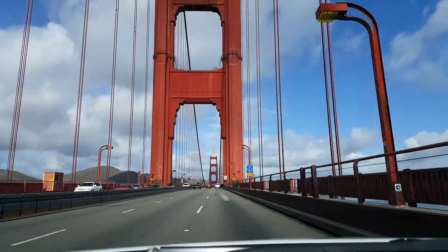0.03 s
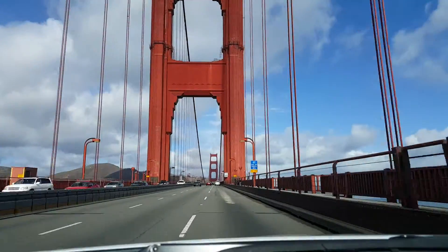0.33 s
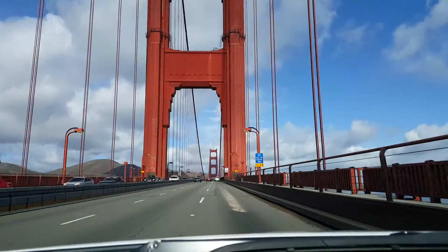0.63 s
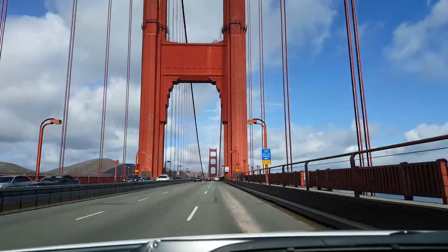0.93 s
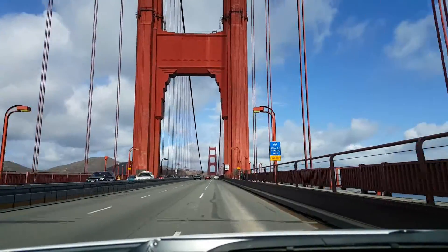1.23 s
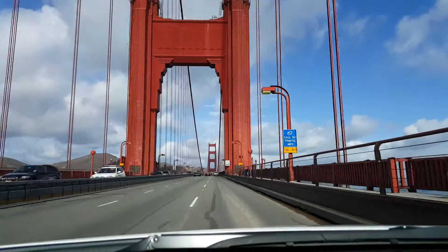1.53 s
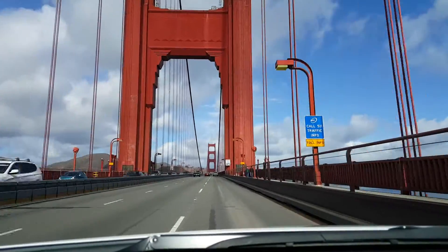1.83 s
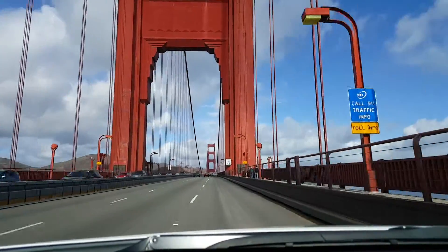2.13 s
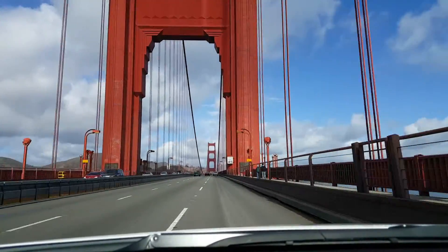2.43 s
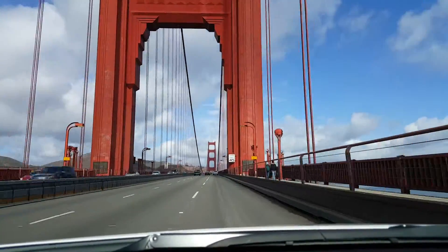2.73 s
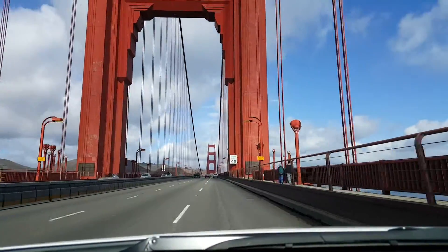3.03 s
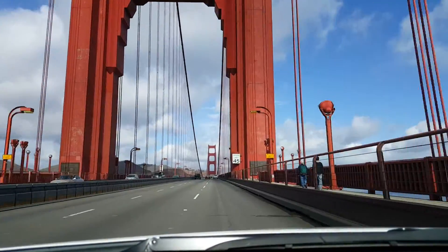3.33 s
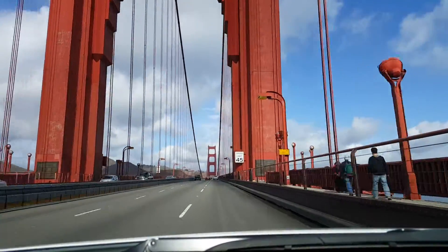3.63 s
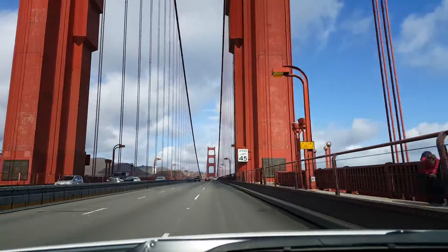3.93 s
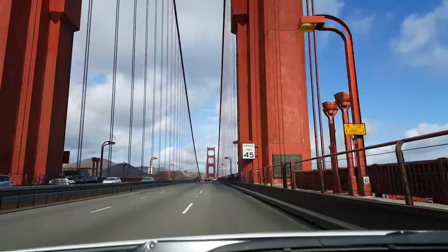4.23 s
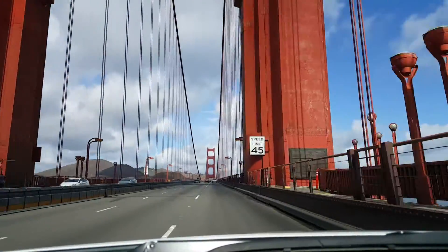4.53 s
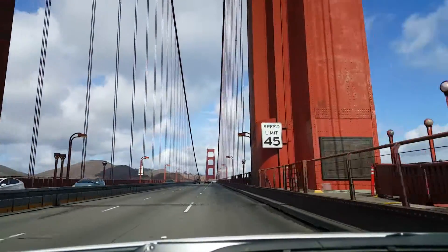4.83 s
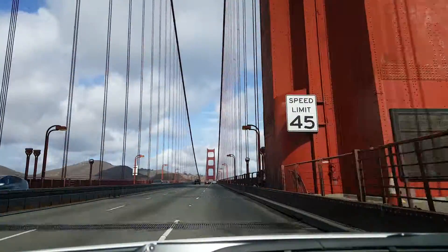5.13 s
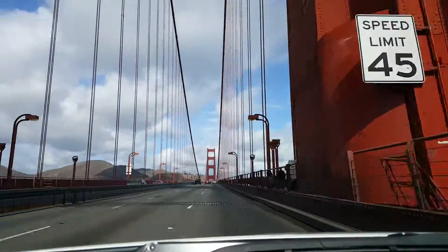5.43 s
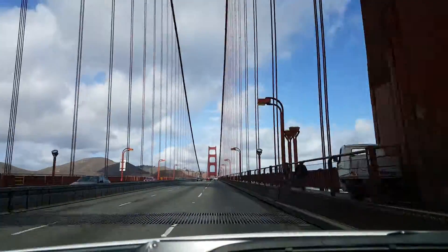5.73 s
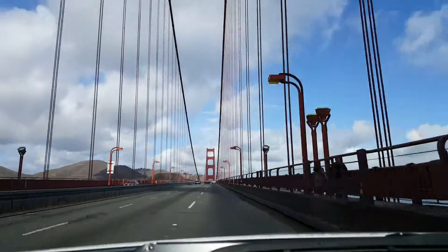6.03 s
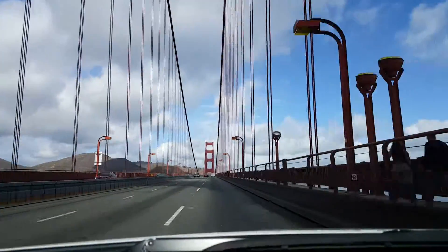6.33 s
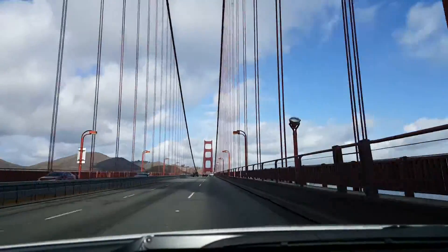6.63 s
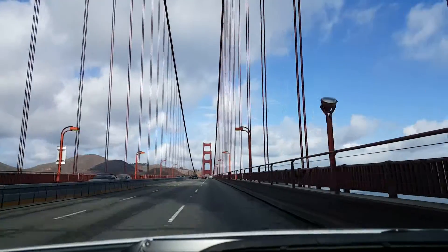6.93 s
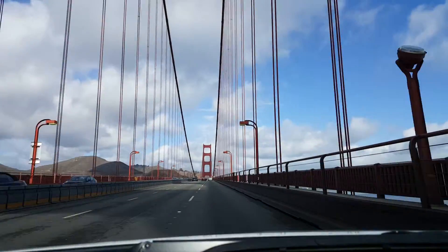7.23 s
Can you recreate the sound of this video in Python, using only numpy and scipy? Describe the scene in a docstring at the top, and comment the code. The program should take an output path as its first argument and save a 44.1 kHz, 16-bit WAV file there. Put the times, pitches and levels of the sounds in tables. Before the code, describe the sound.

A steady, deep road rumble is heard from inside a car crossing a bridge, with tyre roar and a soft rush of air that slowly grow. The wheels thump dully over seams around 0.3 seconds, between 1 and 1.2, and just before 2, with softer bumps through the middle. Faint plastic ticks come near 0.6 seconds, and light hollow trim knocks at about 1.4, 2.5 and 4.5. Low hums from the tyres and panels swell and fade. At 5.2 seconds a small catch snaps slightly to the right, among more ticks and a faint chatter. From about 5.7 the road is rougher and louder, with a run of thumps, a very faint gritty rasp, and clearer knocks between 6.2 and 6.7. A quiet metal clink rings at about 7 seconds, and a firm thump follows at 7.3 as the rumble continues.

```python
"""Road rumble inside a car crossing a bridge, heard from behind the windscreen.
Rough asphalt shakes the body and booms in the cabin, the tyres roar and air hisses past the glass.
Seams in the bridge thump under the wheels, panels and the air in the tyres hum, and the tread rasps.
Loose trim ticks, knocks and rustles, a catch snaps and chatters, and a metal piece clinks near the end.
A very faint electronic whine comes and goes."""
import sys
import numpy as np
from scipy import signal
from scipy.fft import rfft, irfft
from scipy.io import wavfile
from scipy.ndimage import uniform_filter1d

SR = 44100
rng = np.random.default_rng(int(sys.argv[2]) if len(sys.argv) > 2 else 0)


def digitize_waveform(pressure):
    """Quantize a signal to 16-bit integers and store it at the path in sys.argv[1].

    Rows of a 2-D input are taken as channels; values are limited to [-1, 1].
    """
    field = np.atleast_2d(pressure).T
    bounded = np.clip(field, -1, 1)
    quanta = np.round(bounded * 32767).astype(np.int16)
    wavfile.write(sys.argv[1], SR, quanta)


N = 325017
TIME = np.arange(N) / SR
FREQ = np.maximum(np.arange(N // 2 + 1) * SR / N, 1)


def from_db(db):
    """Turn decibels into a number to multiply by."""
    return 10 ** (np.asarray(db) / 20)


def pan(left_db):
    """Raise the left side and lower the right; a negative value leans right."""
    return from_db([[left_db], [-left_db]])


def rms_one(x):
    """Scale a sound so that the mean of its channels has an average (rms) size of 1."""
    return x / np.sqrt(np.mean(np.atleast_2d(x).mean(axis=0) ** 2) + 1e-20)


def over_time(points):
    """Join (time, value) points with straight lines."""
    return np.interp(TIME, *np.transpose(points))


def over_hz(points):
    """Join (pitch, value) points with straight lines, spacing octaves evenly."""
    hz, value = np.transpose(points)
    return np.interp(np.log(FREQ), np.log(hz), value)


def colour_db(colour):
    """A noise's level at each pitch; past the ends of its table it falls 24 dB an octave."""
    octaves = np.log2(FREQ / np.clip(FREQ, colour[0][0], colour[-1][0]))
    return over_hz(colour) - 24 * np.abs(octaves)


def bell(hz, width_hz):
    """A peak of height 1 around one pitch: the shape of a resonance."""
    return 1 / (1 + (2 * (FREQ - hz) / width_hz) ** 2)


def drift(rate_hz):
    """A random wander with a typical size of 1."""
    return rms_one(irfft(rfft(rng.standard_normal(N)) / (1 + (FREQ / rate_hz) ** 2), N))


def swell(s, length_s):
    """A smooth hump of height 1 around time s."""
    return np.exp(-np.pi * ((TIME - s) / length_s) ** 2 / 2)


def swells(rows):
    """Add up humps, each with its own time, length and level."""
    return sum(from_db(db) * swell(s, length_s) for s, length_s, db in rows)


def dying(s, fade_s, rise_s):
    """The loudness of a hit at time s: a quick rise, and a fall of 60 dB in fade_s."""
    out = np.zeros(N)
    live = slice(int(s * SR) + 1, int((s + 2 * fade_s) * SR))
    age = TIME[live] - s
    out[live] = (1 - np.exp(-age / rise_s)) * np.exp(-np.log(1000) * age / fade_s)
    return out


def ring(s, hz, fade_s, rise_s):
    """One tone, struck at time s and dying away."""
    out = dying(s, fade_s, rise_s)
    live = out > 0
    out[live] *= np.sin(2 * np.pi * hz * (TIME[live] - s))
    return out


def steadied(x, span_s):
    """Even out the slow swell of a noise and keep its fast grain."""
    size = max(int(span_s * SR), 1)
    power = uniform_filter1d(uniform_filter1d(x.mean(axis=0) ** 2, size), size)
    return x / np.sqrt(power + 1e-12)


def grit(hits_per_s, spread_db):
    """Tiny random hits as a stereo spectrum; spread_db makes their sizes uneven."""
    sizes = from_db(spread_db * np.minimum(rng.exponential(1, (2, N)), 3))
    signs = rng.choice([-1, 1], (2, N))
    hits = rng.random((2, N)) < hits_per_s / SR
    return rfft(sizes * signs * hits)


# Pitches at which the cabin air, tyres and panels ring: pitch_hz, width_hz, boost_db
CABIN_RESONANCES = [(41.4, 3.9, 1), (58.6, 8.6, 8.5), (81.8, 10, 13), (106.9, 11, 6), (154.1, 33, 8),
                    (210.8, 4.9, 8.5), (231.6, 16, 5), (283.3, 10, 9.5), (307.5, 12, 6), (449, 23, 3.5),
                    (615, 99, 3.5), (771, 18, 6), (879, 48, 6), (973, 68, 6), (2805, 140, 3)]
# How alike the left and right sides sound: pitch_hz, likeness_0_to_1
LIKENESS = [(30, 1), (100, 0.95), (170, 0.92), (300, 0.93), (390, 0.3), (460, 0.84), (520, 1), (620, 0.3),
            (780, 0.87), (920, 0.8), (1150, 0.03), (1500, 0.8), (2200, 0.6), (2800, 0), (4000, 0.1),
            (8000, 0)]
# How much louder the left side is: pitch_hz, left_minus_right_db
BALANCE = [(40, .6), (90, 2.3), (170, 2.3), (300, .8), (500, -.7), (1100, .6), (2000, 0), (3000, -3),
           (4300, -6.5), (6000, -3), (9000, 0), (15000, 1)]

def cabin_noise(colour, lag_s=0.00044, lag_from_hz=850):
    """Stereo noise shaped by the cabin's resonances; its higher pitches reach the left side first."""
    boost_db = sum(db * bell(hz, width) for hz, width, db in CABIN_RESONANCES)
    gain = from_db(colour_db(colour) + boost_db)
    alike = np.clip(over_hz(LIKENESS), 0, 1)
    mid, side = rfft(rng.standard_normal((2, N)))
    sides = np.array([[1], [-1]])
    stereo = np.sqrt(1 + alike) * mid + np.sqrt(1 - alike) * side * sides
    delay_s = lag_s / (1 + (lag_from_hz / FREQ) ** 12)
    left_first = np.exp(1j * np.pi * FREQ * delay_s * sides)
    balance = from_db(sides * over_hz(BALANCE) / 2)
    return rms_one(irfft(stereo * left_first * gain * balance, N))


# How rough the asphalt is along the way: time_s, above_usual_db
ROUGHNESS = [(.2, -8), (.3, -1), (.58, -4.5), (.72, -5.5), (.95, -5.5), (1.2, -1), (1.98, -3),
             (2.12, -11.5), (2.45, -5.5), (2.58, -2), (3.1, -2.5), (3.42, 0.5), (4.02, 0), (5.05, -3),
             (5.78, 4), (6.0, -2), (6.35, 2.5), (7.37, 4)]

def road_gain(trend, extra_db):
    """A layer's loudness follows the roughness of the road, on top of any steady rise."""
    start_db, rise_db_per_s, roughness_share = trend
    return from_db(start_db + rise_db_per_s * TIME + roughness_share * over_time(ROUGHNESS) + extra_db)


# Smooth patches of road: middle_s, length_s, rumble_dip_db, roar_dip_db
SMOOTH_PATCHES = [(0.129, 0.02, 9, -1), (0.74, 0.04, 7.5, 3), (1.103, 0.014, 14, 4.5),
                  (1.675, 0.023, 8, 1.5), (1.834, 0.042, 4, 5.5), (2.353, 0.029, 9, 3),
                  (2.473, 0.063, 5, 4), (2.858, 0.033, 11, 1), (3.779, 0.069, 7.5, 5.5),
                  (5.599, 0.042, 5.5, 2.5), (6.227, 0.07, 0, 4.5), (6.46, 0.1, 3, 3.5),
                  (6.714, 0.063, 6.5, 4.5)]

def patch_dips():
    """How many dB the smooth patches take off the rumble and off the tyre roar."""
    return sum(np.outer([rumble_db, roar_db], swell(s, length_s))
               for s, length_s, rumble_db, roar_db in SMOOTH_PATCHES)


# The body rocks on its springs over long waves in the bridge: time_s, level_db
ROCKING = [(.08, -33), (.3, -24.5), (.8, -30), (1.28, -25.5), (1.7, -29.5), (2.25, -34.5), (2.85, -35.5),
           (3.08, -33), (4.8, -28), (5.5, -24.5), (6.05, -28.5), (6.36, -19), (6.8, -30.5), (7.37, -24.5)]
# Tone of the rocking body, the booming cabin and the droning panels: pitch_hz, level_db
ROCKING_COLOUR = [(15, -32), (25, -19), (32, -8), (41, -6), (50, -5.5), (62, -12.5)]
BOOM_COLOUR = [(46, -7), (58, -4.5), (85, 0), (125, 2), (165, -2.5), (195, -14.5), (260, -50)]
DRONE_COLOUR = [(130, -20.5), (180, -0.5), (215, -1), (250, -3), (300, -2.5), (345, -4), (390, -9.5),
                (520, -56)]
# How boom and drone follow the road: start_db, rise_db_per_s, roughness_share
BOOM_TREND = (-20, 0, 0.8)
DRONE_TREND = (-24, 0.47, .45)

def road_rumble(flutter_db=1.0):
    """Rough asphalt rocks the body, shakes the suspension and sets the panels droning."""
    dip_db, _ = patch_dips()
    surface_db = flutter_db * drift(rate_hz=22) - dip_db
    rocking = from_db(over_time(ROCKING) - dip_db) * steadied(cabin_noise(ROCKING_COLOUR), span_s=0.49)
    boom = road_gain(BOOM_TREND, surface_db) * steadied(cabin_noise(BOOM_COLOUR), span_s=0.15)
    drone = road_gain(DRONE_TREND, surface_db) * steadied(cabin_noise(DRONE_COLOUR), span_s=0.12)
    return rocking + boom + drone


# Tone of the rolling tread: pitch_hz, level_db
ROAR_COLOUR = [(280, -28), (390, -1.5), (460, 1), (530, -4), (650, -1.5), (760, -4), (900, -2.5),
               (1100, -7), (1400, -11.5), (1800, -34), (3000, -60)]
# How the roar follows the road: start_db, rise_db_per_s, roughness_share
ROAR_TREND = (-34, 0.42, 0.12)

def tyre_roar(flutter_db=1.07):
    """The tread roars on the asphalt, wavering a little."""
    _, dip_db = patch_dips()
    gain = road_gain(ROAR_TREND, flutter_db * drift(rate_hz=7) - dip_db)
    return gain * steadied(cabin_noise(ROAR_COLOUR), span_s=0.11)


# Tone of the rushing air and of the high hiss: pitch_hz, level_db
AIR_COLOUR = [(1000, -7), (1500, 4), (2000, -6), (2800, -10), (3300, -13), (3800, -14), (4600, -22),
              (5500, -29), (7000, -34), (10000, -42), (16000, -56.5)]
HISS_COLOUR = [(3000, -16.5), (6000, -4.5), (8000, -1), (9500, -3.5), (11000, 1), (12200, 3.5), (13500, -1),
               (16000, -2)]
# How the rush follows the road: start_db, rise_db_per_s, roughness_share
AIR_TREND = (-49.5, 0.45, .02)

def air_rush(flutter_db=0.85, dip_share=0.4, hiss_db=-73):
    """Air rushes past the glass with a quick flutter, over a faint even hiss."""
    _, dip_db = patch_dips()
    gain = road_gain(AIR_TREND, flutter_db * drift(rate_hz=47) - dip_share * dip_db)
    return gain * cabin_noise(AIR_COLOUR) + from_db(hiss_db) * cabin_noise(HISS_COLOUR)


def with_repeat(hits, delay_s=0.13, repeat_db=-12.5):
    """Each hit is followed by a softer one a moment later."""
    return hits + from_db(repeat_db) * np.interp(TIME - delay_s, TIME, hits, left=0)


# Thumps of the wheels over seams and dents: start_s, thump_db, pitch_hz, slap_db
SEAMS = [(0.26, -3, 111, -30), (.392, -8, 139, -41), (0.475, -7, 76, -45), (.992, -2.5, 95, -27),
         (1.134, 0.5, 108.6, -42), (1.192, -5, 83.5, -45), (1.701, -8, 86, -25), (1.925, -7, 96.3, -30),
         (2.536, -10, 102.6, -27), (2.565, -11, 91.5, -40), (2.899, -16.5, 97.6, -34),
         (3.489, -16.5, 87, -39), (3.826, -10.5, 133.5, -32), (3.98, -15, 89.7, -43.5),
         (4.42, -8.5, 216.8, -52), (5.211, -7.5, 213.5, -34), (5.346, -5, 103.5, -44),
         (5.465, -27, 172, -43), (5.745, -1.5, 95, -40), (5.802, -5.5, 76.6, -45), (5.837, -18, 111, -34),
         (6.163, -5, 83.7, -30.5), (6.303, -2, 80.3, -34.5), (6.343, -2.5, 57, -42), (6.399, -3, 208, -33),
         (6.506, -2, 65.7, -27.5), (6.554, -12.5, 114, -28), (6.635, -20, 125, -24),
         (6.86, -2.5, 92.6, -41), (6.956, -13, 91, -32), (7.097, -11, 84, -46), (7.324, 1.5, 92.5, -26)]

def seam_thumps(fade_s=0.21, cabin_db=-10.5, db_per_octave=-8.0):
    """A wheel thumps over a seam and sets the cabin's low pitches ringing; the tread slaps the edge."""
    thumps, slaps = np.zeros(N), np.zeros(N)
    for s, db, thump_hz, slap_db in SEAMS:
        slaps += from_db(slap_db) * dying(s, fade_s=0.11, rise_s=0.00046)
        thumps += from_db(db) * ring(s, thump_hz, fade_s, rise_s=0.008)
        for k, (hz, _, _) in enumerate(CABIN_RESONANCES[:9]):
            octaves_away = abs(np.log2(hz / thump_hz))
            ring_db = db + cabin_db + db_per_octave * octaves_away + rng.normal(0, 0.9)
            thumps += (-1) ** k * from_db(ring_db) * ring(s, hz, fade_s, rise_s=0.012)
    return with_repeat(thumps) * pan(left_db=1) + with_repeat(slaps) * cabin_noise(ROAR_COLOUR)


# Tone of the plastic trim: pitch_hz, level_db
PLASTIC_COLOUR = [(2500, -20), (3800, -3.5), (5000, -3.5), (9000, -5), (13000, -0.5), (16000, -6)]
# Pitches at which the trim rings: pitch_hz, width_hz, boost_db
TRIM_RESONANCES = [(4850, 160, 8), (5800, 120, 1), (6280, 150, 3), (7580, 250, 4.5), (8200, 300, 1.5),
                   (12500, 300, 2)]
# Small plastic ticks: start_s, level_db, peak_hz, peak_width_hz, fade_s
TICKS = [(.5702, -60, 15000, 2500, .015), (.5812, -48, 10300, 700, 0.07), (.5865, -56, 5300, 1400, 0.045),
         (0.6165, -44, 12600, 500, .075), (0.6245, -47, 8400, 1200, 0.046), (.638, -58, 8200, 900, .09),
         (4.164, -58, 9400, 4000, 0.012), (5.1225, -61, 14000, 3000, .02), (5.151, -45, 8600, 3200, 0.058),
         (5.2247, -41, 12200, 1200, 0.028), (5.227, -54, 6600, 400, .08), (5.252, -63, 6200, 300, .09),
         (5.4975, -51, 10000, 4000, 0.014), (5.6098, -52, 5470, 2500, 0.048), (5.653, -57, 6000, 2500, .03),
         (5.7693, -51, 9000, 4000, .02), (5.96, -52, 10000, 4000, 0.017), (6.4274, -54, 13100, 4000, 0.016),
         (6.6888, -56.5, 9500, 4000, .015)]

def trim_ticks(peak_db=10.5, crack_db=5.0):
    """Each tick is a bright crack that rings on in the trim and scatters round the cabin."""
    out = np.zeros((2, N))
    trim_db = colour_db(PLASTIC_COLOUR) + sum(db * bell(hz, width) for hz, width, db in TRIM_RESONANCES)
    white = rfft(rng.standard_normal((2, N)))
    for s, db, hz, width_hz, fade_s in TICKS:
        noise = rms_one(irfft(white * from_db(trim_db + peak_db * bell(hz, width_hz)), N))
        crack = from_db(crack_db) * dying(s, fade_s=0.0047, rise_s=0.0002)
        scatter = dying(s, fade_s, rise_s=0.0015)
        out += from_db(db) * noise * (crack + scatter)
    return out


# Spells of electronic whine: start_s, end_s, pitch_hz, level_db
WHINES = [(.66, 1.55, 11655, -83), (1.6, 2.85, 11235, -82.5), (4.4, 4.92, 11660, -83.5),
          (5.85, 6.6, 11650, -83), (7.05, 7.37, 11660, -86)]

def electronic_whine(waver_hz=9):
    """A thin, slightly unsteady tone, almost too faint to hear."""
    out = np.zeros(N)
    waver_cycles = waver_hz * np.cumsum(drift(rate_hz=20)) / SR
    for start_s, end_s, hz, db in WHINES:
        tone = np.sqrt(2) * np.sin(2 * np.pi * (hz * TIME + waver_cycles))
        out += from_db(db) * tone * (TIME > start_s) * (TIME < end_s)
    return out


# Hums of the panels and tread: middle_s, length_s, level_db, pitch_hz
HUMS = [(1.451, .27, -30.5, 295), (2.951, 0.46, -39, 467), (3.699, 2.2, -44.5, 885), (4.552, .12, -38, 770),
        (6.253, .19, -35, 477), (7.1, .35, -40.5, 487)]

def panel_hums(width_share=0.18):
    """The road stirs single resonances, each a narrow band of noise that swells and fades."""
    out = np.zeros((2, N))
    for s, length_s, db, hz in HUMS:
        spectrum = rfft(cabin_noise([(hz, 0)]))
        band = irfft(spectrum * np.sqrt(bell(hz, width_share * hz)), N)
        out += from_db(db) * swell(s, length_s) * steadied(band, span_s=0.092)
    return out


# Hollow knocks of loose trim: start_s, level_db, pitch_hz
KNOCKS = [(1.400, -27, 627), (2.42, -28, 1156), (2.535, -28, 610), (3.829, -35, 1460), (4.504, -22, 758),
          (5.208, -20, 533), (6.163, -11, 604), (6.294, -16.5, 644), (6.635, -22, 730), (6.655, -22.5, 800)]

def trim_knocks(scatter_db=-14.0):
    """A panel knocks with three close tones, and the knock scatters round the cabin."""
    direct, scatter = np.zeros(N), np.zeros(N)
    for s, db, hz in KNOCKS:
        scatter += from_db(db + scatter_db) * dying(s, fade_s=0.1, rise_s=0.0021)
        for pitch_ratio, share in ((1, 1), (1.1, -0.45), (0.87, 0.4)):
            direct += from_db(db) * share * ring(s, hz * pitch_ratio, fade_s=0.067, rise_s=0.0019)
    return direct + scatter * cabin_noise(ROAR_COLOUR)


# Swells of the air ringing inside the tyres: middle_s, length_s, level_db
TYRE_HUMS = [(2.72, 0.51, -27), (3.399, 0.25, -25.5), (3.99, 0.19, -23.5), (6.411, 0.16, -16.5),
             (6.624, 0.11, -22.5)]

def tyre_air_hum(pitch_hz=215.4, width_hz=28):
    """The air shut inside the tyres hums around one low pitch."""
    white = rfft(rng.standard_normal((1, N)))
    hum = rms_one(irfft(white * bell(pitch_hz, width_hz), N))
    return swells(TYRE_HUMS) * steadied(hum, span_s=0.018) * pan(left_db=1.3)


# A catch snapping shut: start_s, level_db, pitch_hz, fade_s
SNAPS = [(5.2238, -25, 2770, 0.02)]

def catch_snap():
    """A small catch snaps once, on the right, with a very short ring."""
    snap = sum(from_db(db) * ring(s, hz, fade_s, rise_s=0.00081) for s, db, hz, fade_s in SNAPS)
    return snap * pan(left_db=-2)


# The loose catch chatters over the bridge joints: middle_s, length_s, level_db
CHATTERS = [(5.556, 0.016, -50), (5.614, 0.014, -54), (6.166, 0.013, -51)]

def catch_chatter(pitch_hz=2950, width_hz=1100):
    """The catch buzzes against its seat in a quick run of tiny taps."""
    taps = grit(hits_per_s=1500, spread_db=0)
    buzz = rms_one(irfft(taps * bell(pitch_hz, width_hz), N))
    return swells(CHATTERS) * buzz * pan(left_db=-1)


# The car crosses the bridge's steel joints: middle_s, length_s, rustle_db
JOINTS = [(5.777, .3, -66.5), (6.5, 0.25, -65.5)]
# Tone of the tread on the steel: pitch_hz, level_db
RASP_COLOUR = [(1800, 2), (3400, -0.5), (4600, -2), (6000, -11), (8000, -14)]

def joint_rasp_and_rustle(peak_db=4.5, rasp_above_rustle_db=6.5):
    """Over the joints the tread gives a gritty rasp, and rubbing plastic a faint, crackly hiss."""
    plastic = from_db(colour_db(PLASTIC_COLOUR) + peak_db * bell(hz=7000, width_hz=3000))
    rustle = irfft(grit(hits_per_s=3000, spread_db=4) * plastic, N)
    rasp = irfft(grit(hits_per_s=1300, spread_db=4) * from_db(colour_db(RASP_COLOUR)), N)
    return swells(JOINTS) * (rms_one(rustle) + from_db(rasp_above_rustle_db) * rms_one(rasp))


# Loose metal, first a dull tap, then a free ring: start_s, level_db, fade_share, tilt_db_per_octave
CLINKS = [(7.014, -47, .12, -13), (7.06, -48.7, 1, 0)]
# The tones of that metal piece: pitch_hz, level_db, fade_s
METAL_TONES = [(2215, -4, .5), (2265, 0, .8), (3450, -9, .43), (3644, -8, 1.1), (3700, -6, .6),
               (3763, -2.5, .9), (3812, -.5, .7), (3946, -10, 1.0), (4113, -6, .3), (4447, -13, .5)]

def metal_clink(buzz_db=-4.0, buzz_width_hz=100, buzz_fade_s=0.7):
    """Close metal tones beat as they fade; the piece buzzes against its seat, which blurs them."""
    out = np.zeros((2, N))
    white = rfft(rng.standard_normal((2, N)))
    lowest_hz = METAL_TONES[0][0]
    for s, db, fade_share, tilt_db in CLINKS:
        tones, buzz_shape = np.zeros(N), np.zeros_like(FREQ)
        for hz, tone_db, fade_s in METAL_TONES:
            gain = from_db(tone_db + tilt_db * np.log2(hz / lowest_hz))
            tones += rng.choice([-1, 1]) * gain * ring(s, hz, fade_s * fade_share, rise_s=0.002)
            buzz_shape += gain * bell(hz, buzz_width_hz)
        buzz = rms_one(irfft(white * buzz_shape, N)) * dying(s, buzz_fade_s * fade_share, rise_s=0.0025)
        out += from_db(db) * (tones + from_db(buzz_db) * buzz)
    return out


def scene():
    """Road, tyres and air, with the small noises on top."""
    driving = road_rumble() + tyre_air_hum() + panel_hums() + tyre_roar() + air_rush() + seam_thumps()
    rattles = trim_knocks() + catch_snap() + trim_ticks() + joint_rasp_and_rustle() + catch_chatter()
    return driving + rattles + metal_clink() + electronic_whine()


def record(dry, ceiling=0.85, cutoff_hz=15800):
    """Round off the loudest peaks and cut the highest treble."""
    rounded = dry / (1 + (dry / ceiling) ** 6) ** (1 / 6)
    low_pass = signal.ellip(10, 0.1, 80, cutoff_hz, fs=SR, output="sos")
    return signal.sosfilt(low_pass, rounded)


dry = scene()
out = record(dry)
digitize_waveform(out)
```